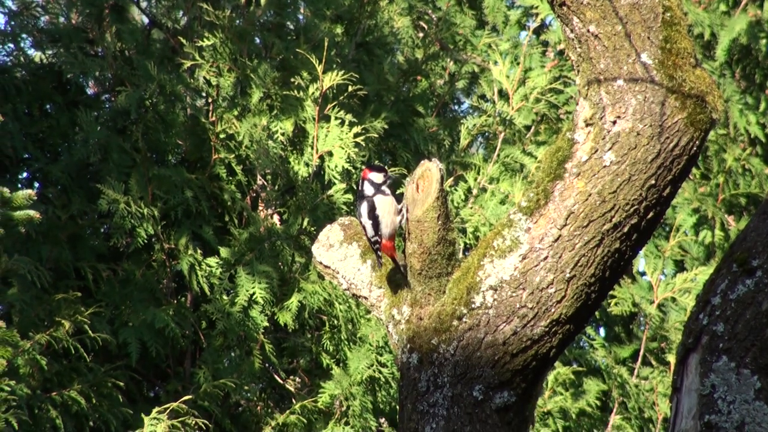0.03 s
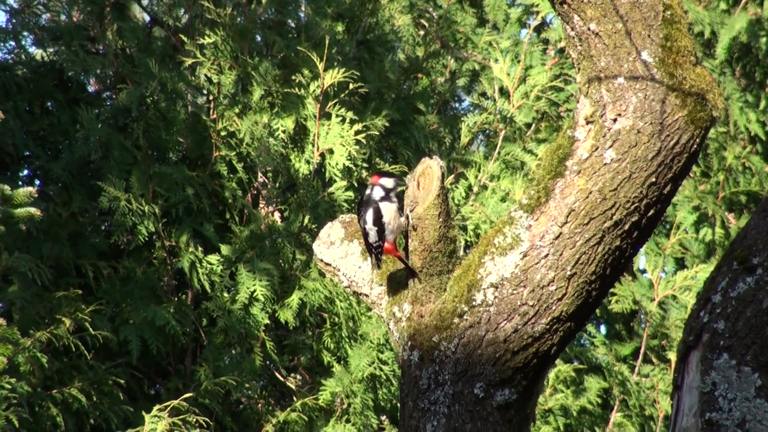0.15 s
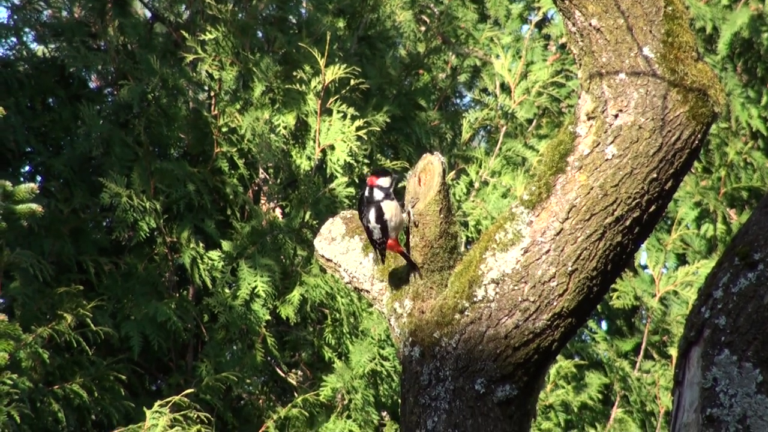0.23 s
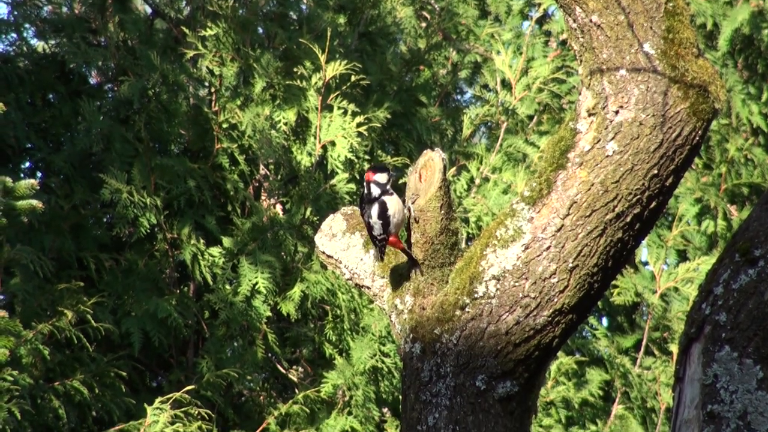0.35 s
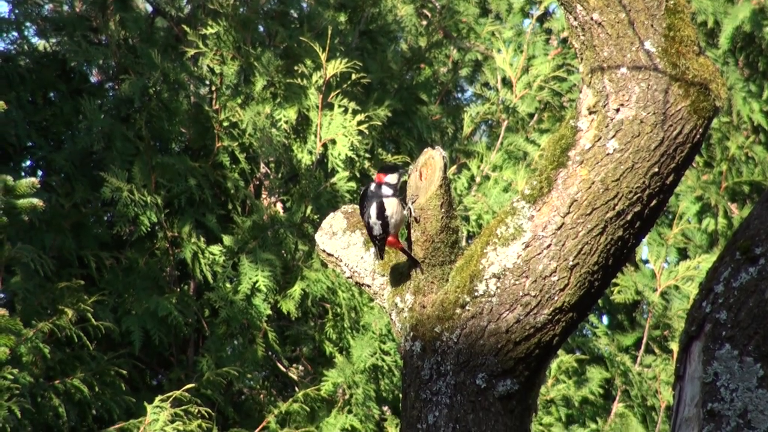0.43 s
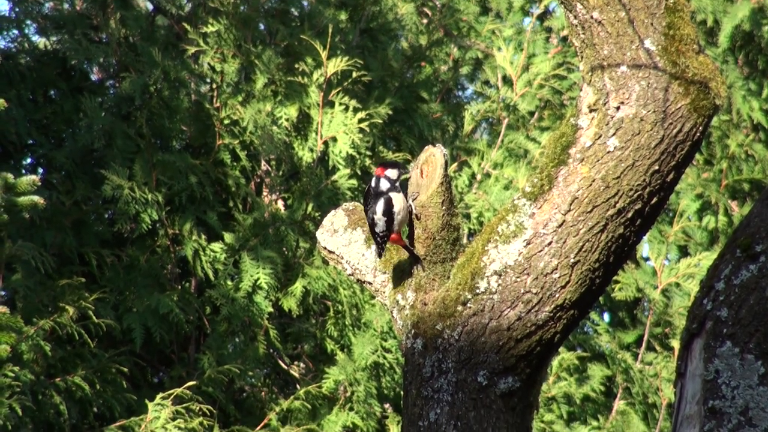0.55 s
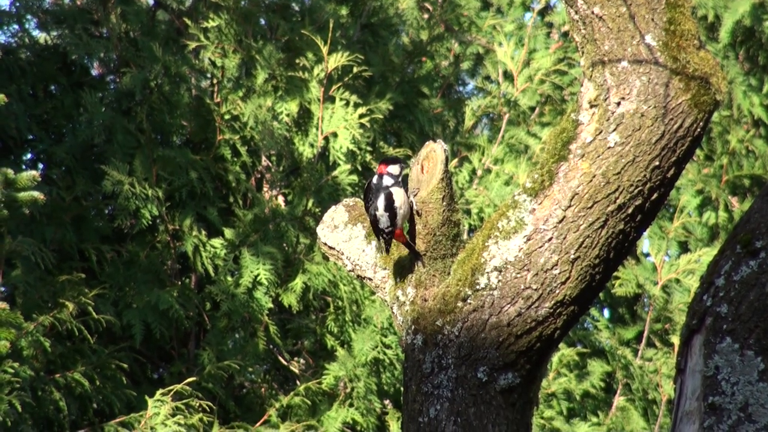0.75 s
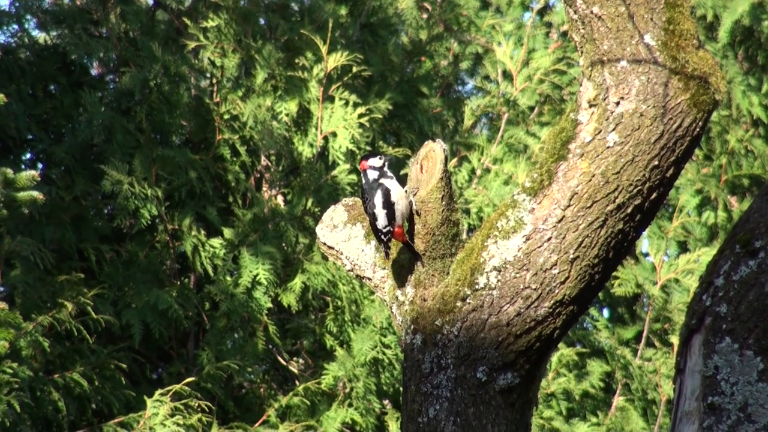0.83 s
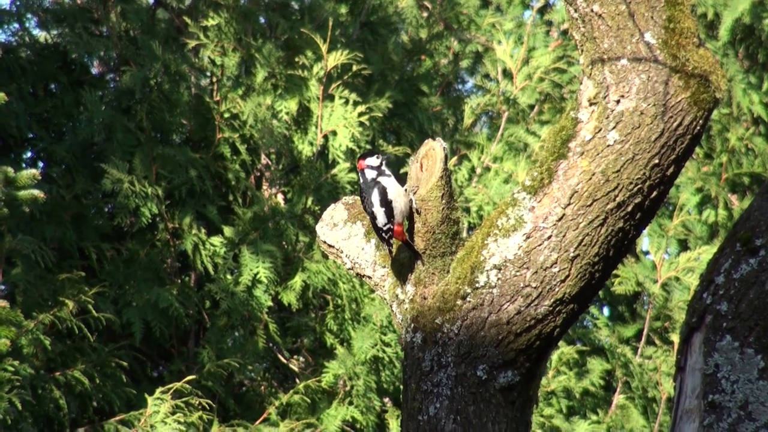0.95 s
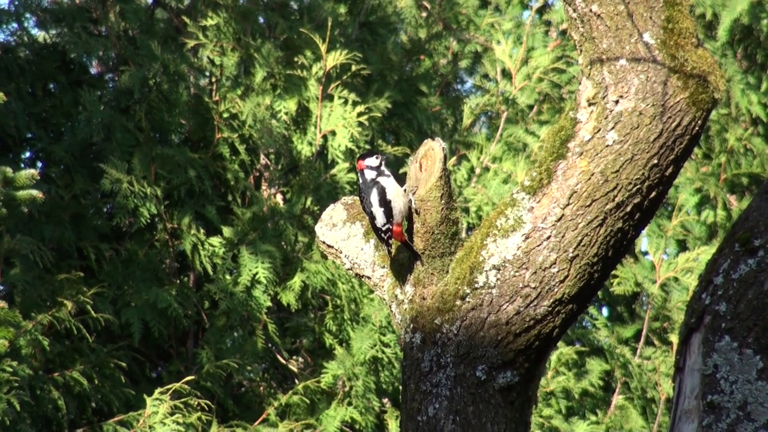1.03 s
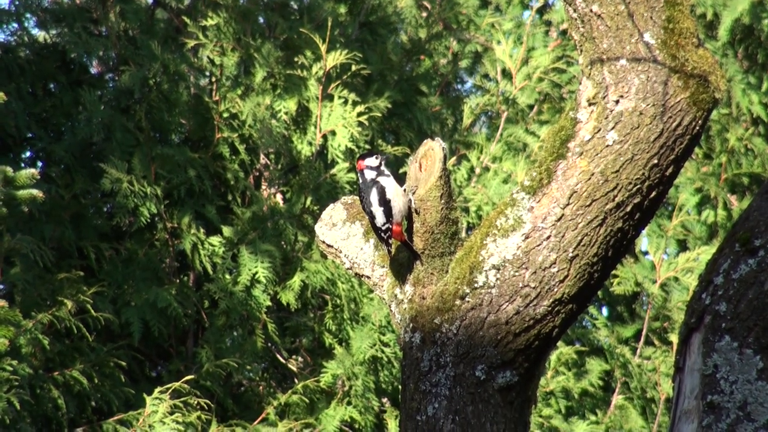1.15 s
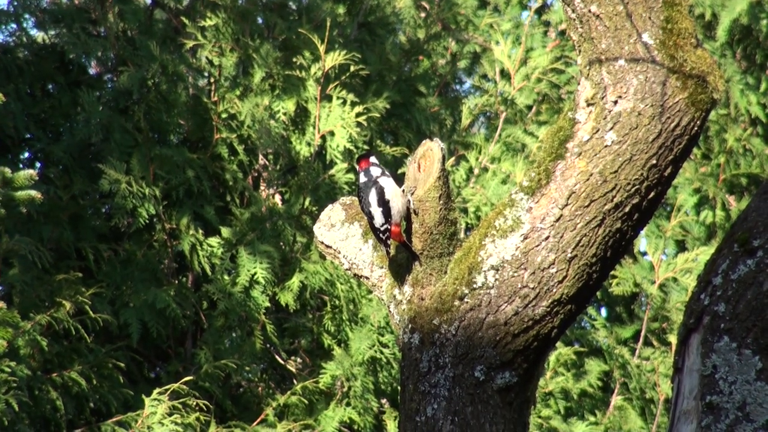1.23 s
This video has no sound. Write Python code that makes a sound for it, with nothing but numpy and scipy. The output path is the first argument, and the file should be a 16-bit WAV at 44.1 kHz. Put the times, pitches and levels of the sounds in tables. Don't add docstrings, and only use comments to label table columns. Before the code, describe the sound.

Woodpecker drumming on a dead tree stub, a rapid accelerating woody roll echoing briefly among trees

```python
import sys
import numpy as np
from scipy import signal
from scipy.fft import rfft, irfft
from scipy.io import wavfile
from scipy.ndimage import uniform_filter1d

SR = 44100
rng = np.random.default_rng(int(sys.argv[2]) if len(sys.argv) > 2 else 0)


def unload_audio(sound):
    columns = np.transpose(np.atleast_2d(sound))
    steps = np.round(np.clip(columns, -1, 1) * 32767)
    wavfile.write(sys.argv[1], SR, steps.astype(np.int16))


def natural_amplitude(level_db):
    exponent = np.asarray(level_db, float) / 20
    return 10 ** exponent


N = 57330


def unit(x):
    return x / np.sqrt(np.mean(x ** 2))


def pan(x, db):
    return x * natural_amplitude(np.array([[db / 2], [-db / 2]]))


def walk(rate):
    k = int(SR / rate)
    steps = np.repeat(rng.standard_normal(N // k + 1), k)
    return 1.3 * uniform_filter1d(uniform_filter1d(steps, k), k)[:N]


def bands(x, centres):
    log_hz = np.log(np.arange(len(x) // 2 + 1) * SR / len(x) + 1)
    spectrum = rfft(x)
    return [irfft(spectrum * np.interp(log_hz, np.log(centres), row), len(x)) for row in np.eye(len(centres))]


def swell(t, rise, hold, fall):
    attack = np.sin(np.pi / 2 * np.clip(t / rise, 0, 1)) ** 2
    return attack * np.exp(-(np.clip(t - rise - hold, 0, 1) / fall) ** 2)


def sines(modes, t):
    scatter_db, detune = .9, .0015
    hz, db = np.array(modes).T[:2, :, None]
    louder, sharper = rng.standard_normal((2, len(modes), 1))
    sign = (-1.) ** np.arange(len(modes))[:, None]
    tone = np.sin(2 * np.pi * hz * (1 + detune * sharper) * t)
    return sign * natural_amplitude(db + scatter_db * louder) * tone


def ring(modes, t, rise):
    decay = natural_amplitude(-60 * t / np.array(modes)[:, 2:])
    return (sines(modes, t) * decay).sum(axis=0) * swell(t, rise, 1, 1)


def crack(t):
    # (frequency [Hz], width [Hz], level [dB])
    splinters = [(4100, 700, -13), (4800, 500, -3), (5510, 600, 0), (6400, 900, -3), (7700, 1400, -5),
                 (11000, 4000, -20)]
    t60_s, rise_s, bounce_s, bounce_db = .03, .0002, .0102, -12
    f = np.arange(len(t) // 2 + 1) * SR / len(t)
    colour = 0
    for hz, width_hz, db in splinters:
        strength = natural_amplitude(db + 2 * rng.standard_normal())
        colour = colour + strength / np.hypot(1, (2 * (f - hz) / width_hz) ** 2)
    noise = unit(irfft(rfft(rng.standard_normal(len(t))) * colour, len(t)))
    direct = natural_amplitude(-60 * t / t60_s)
    bounce = (t > bounce_s) * natural_amplitude(bounce_db - 60 * np.abs(t - bounce_s) / t60_s)
    return noise * (direct + bounce) * swell(t, rise_s, 1, 1)


def upper_waves(t):
    # (frequency [Hz], level [dB])
    treble = [(2680, 0), (2880, 1), (3095, 3.5), (3310, -5), (3800, -10.5)]
    # (rise [s], hold [s], fall [s])
    treble_swell = (.0005, .0075, .002)
    t60_s = 0.047
    return sines(treble, t).sum(axis=0) * swell(t, *treble_swell) * natural_amplitude(-60 * t / t60_s)


def middle_waves(t):
    # (frequency [Hz], level [dB])
    partials = [(960, -31), (1170, -6.5), (1500, -11.5), (1765, -1.5), (2100, -27), (2350, -23.5)]
    # (rise [s], hold [s], fall [s])
    partial_swells = [(.005, .002, .005), (.0062, .0003, .0015), (.0015, .003, .002), (.0022, .0032, .0014),
                      (.001, .004, .002), (.001, .004, .002)]
    # (frequency [Hz], level [dB], decay by 60 dB [s])
    after_ring = [(997.3, -16.5, 0.076), (1227.5, -7, .07), (1332.7, 0.5, 0.039), (1466, -1, 0.023),
                  (1645, -4.5, 0.033), (1690, -49, 0.081), (2318, -23, 0.057), (2880, -10, 0.033)]
    rise, hold, fall = np.array(partial_swells).T[:, :, None]
    waves = (sines(partials, t) * swell(t, rise, hold, fall)).sum(axis=0)
    return waves + ring(after_ring, t, .009)


def low_modes(t):
    # (frequency [Hz], level [dB], decay by 60 dB [s])
    bass = [(312.4, -4, 0.12), (357.5, 0.5, 0.22), (410.6, -6, 0.45), (490.6, -1.5, 0.14), (551, -16, 0.23),
            (655.3, 11, 0.052), (793, -14, 0.041), (841, 1, 0.037)]
    return ring(bass, t, .008)


def drumming():
    # (time [s], upper waves [dB], middle waves [dB], low modes [dB], crack [dB])
    blows = [(0.2127, -43.5, -40.5, -51, -57), (0.2725, -36, -31, -48.5, -55.5),
             (0.3287, -38.5, -31.5, -47.5, -40.5), (0.383, -33.5, -30.5, -47.5, -49),
             (0.4354, -33.5, -30.5, -45.5, -48), (0.4877, -32, -29.5, -46.5, -46),
             (0.536, -33.5, -29.5, -47.5, -49.5), (0.5859, -31, -29, -46, -43.5),
             (0.633, -38, -38.5, -45.5, -51.5), (0.6774, -43.5, -32.5, -49.5, -51.5),
             (0.7225, -34.5, -32, -48, -48), (0.7659, -40, -32.5, -46.5, -51.5),
             (0.8065, -38.5, -35.5, -48, -53), (0.8475, -42.5, -35, -49.5, -59)]
    lead_s = .0003
    t = np.arange(SR // 4) / SR
    low, rest = np.zeros((2, N + SR))
    for s, upper_db, middle_db, low_db, crack_db in blows:
        i = int((s - lead_s) * SR)
        here = slice(i, i + len(t))
        low[here] += natural_amplitude(low_db - 0.5) * low_modes(t)
        rest[here] += natural_amplitude(crack_db - 3.5) * crack(t)
        rest[here] += natural_amplitude(middle_db + 2) * middle_waves(t)
        rest[here] += natural_amplitude(upper_db - 12) * upper_waves(t)
    return low[:N], rest[:N]


def forest(x):
    # (centre [Hz], decay by 60 dB [s], level [dB])
    trees = [(350, .5, -12), (900, .65, -7), (1700, .7, -7.5), (3000, .65, -8.5), (7000, .45, -11)]
    near_db, near_t60_s = 7, .14
    rise_s, side_db, patchy_db = .011, -9, 1.2
    t = np.arange(N) / SR
    build_up = 1 - np.exp(-(t / rise_s) ** 2)
    returns = []
    for level_db in (0, side_db):
        patchy = rng.standard_normal(N) * natural_amplitude(patchy_db * walk(132))
        tail = 0
        for part, (hz, t60, db) in zip(bands(patchy, [row[0] for row in trees]), trees):
            far_trunks = natural_amplitude(db - 60 * t / t60)
            near_limbs = natural_amplitude(db + near_db - 60 * t / near_t60_s)
            tail = tail + part * (far_trunks + near_limbs) / np.sqrt(t60 * SR / 14)
        returns.append(natural_amplitude(level_db) * signal.fftconvolve(x, tail * build_up)[:N])
    middle, side = returns
    return np.array([middle + side, middle - side])


def whistle():
    # (time [s], pitch [Hz], level [dB])
    glide = [
        (1.138, 7720, -88),
        (1.148, 7700, -79),
        (1.185, 7500, -80),
        (1.22, 6800, -79),
        (1.26, 6200, -78),
        (1.3, 5700, -76),
    ]
    wet_db, t60_s, pan_db = 7, .45, -3.5
    t = np.arange(N) / SR
    s, hz, db = np.array(glide).T
    phase = 2 * np.pi * np.cumsum(np.interp(t, s, hz)) / SR
    tone = np.sin(phase) * natural_amplitude(np.interp(t, s, db, left=-150))
    wet = []
    for _ in range(2):
        tail = rng.standard_normal(N) * natural_amplitude(-60 * t / t60_s)
        wet.append(signal.fftconvolve(tone, tail)[:N])
    return pan(tone + np.array(wet) * natural_amplitude(wet_db) / np.sqrt(t60_s * SR / 14), pan_db)


def air(shape, db):
    flicker_db = 2.08
    hz, colour_db = np.array(shape + [(17000, shape[-1][1] - 12)]).T
    log_hz = np.log(np.arange(N // 2 + 1) * SR / N + 1)
    colour = natural_amplitude(np.interp(log_hz, np.log(hz), colour_db, left=-60))
    noise = irfft(rfft(rng.standard_normal(N)) * colour, N)
    octaves = bands(noise, 40 * 2. ** np.arange(9))
    return unit(sum(part * natural_amplitude(flicker_db * walk(7.93)) for part in octaves)) * natural_amplitude(db)


def background():
    # (frequency [Hz], density [dB per Hz])
    hum = [(12, -51), (20, -17), (70, 1.5), (171, -10), (408, -11), (441, -14.5), (584, -12.5),
           (9000, -33.5), (11700, -38), (19800, -120)]
    # (frequency [Hz], density [dB per Hz])
    hum_side = [(12, -72), (20, -43), (300, -16), (350, -30), (408, -8), (452, -18), (774, -12),
                (9000, -29), (11700, -35), (19800, -120)]
    # (frequency [Hz], density [dB per Hz])
    hiss = [(7000, -30), (9500, -20), (11500, -4), (13500, -1.5), (16500, -8.5)]
    middle = air(hum, -58.5) + air(hiss, -76)
    return middle + air(hum_side, -65) * np.array([[1], [-1]])


def scene():
    low, rest = drumming()
    stub = pan(low, -0.5) + pan(rest + forest(low + rest), 2.25)
    return stub + whistle() + background()


def band_limit(x):
    return signal.sosfilt(signal.butter(12, 16580, fs=SR, output="sos"), x)


def record(dry):
    side_top_hz, top_hz = 11700, 16500
    narrow = signal.butter(8, side_top_hz, fs=SR, output="sos")
    side = signal.sosfiltfilt(narrow, dry[0] - dry[1]) / 2
    both = dry.mean(axis=0) + side * np.array([[1], [-1]])
    top_cut = signal.ellip(10, .2, 80, top_hz, fs=SR, output="sos")
    return band_limit(signal.sosfilt(top_cut, both))


dry = scene()
out = record(dry)
unload_audio(out)
```